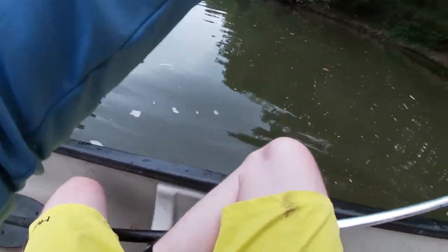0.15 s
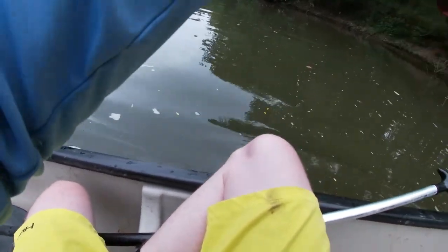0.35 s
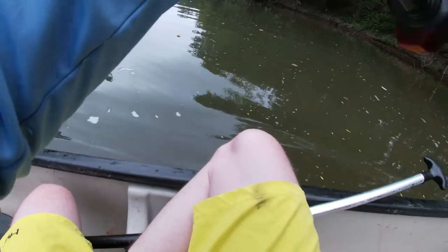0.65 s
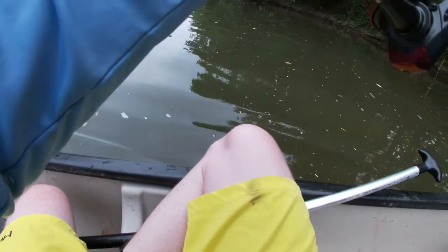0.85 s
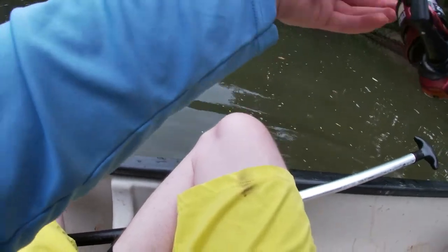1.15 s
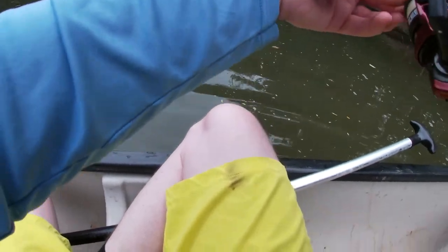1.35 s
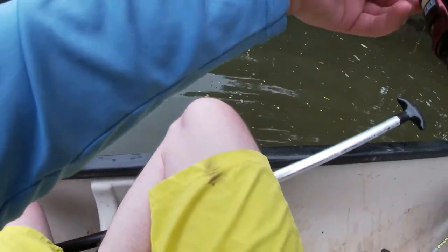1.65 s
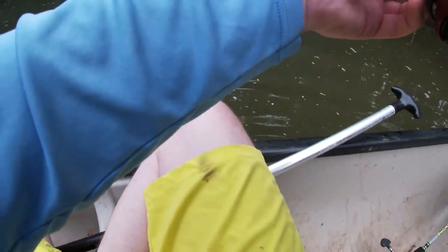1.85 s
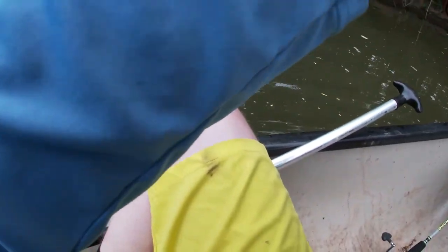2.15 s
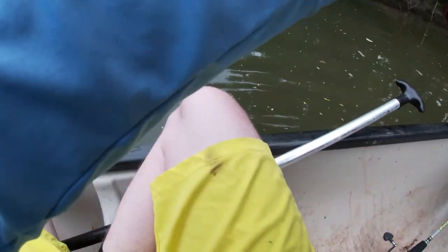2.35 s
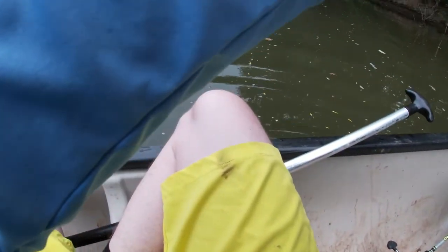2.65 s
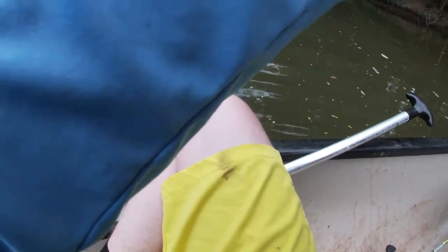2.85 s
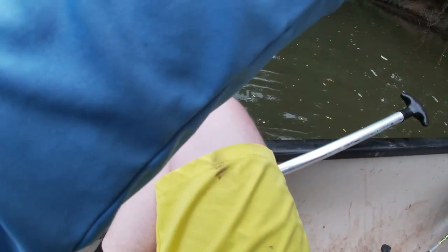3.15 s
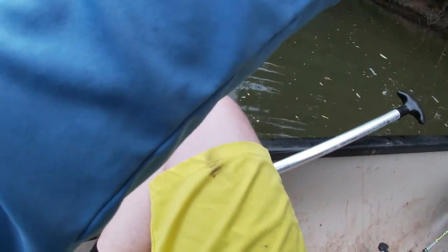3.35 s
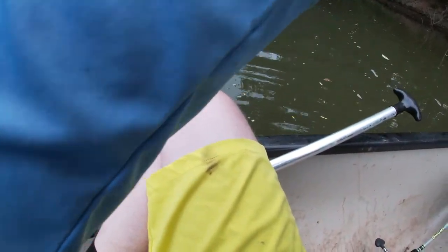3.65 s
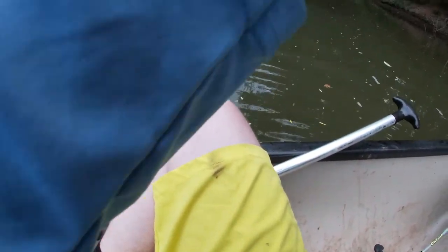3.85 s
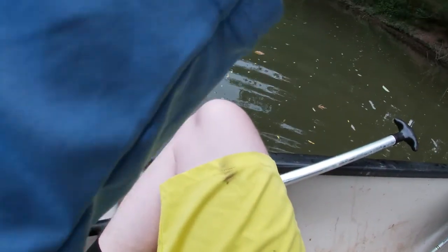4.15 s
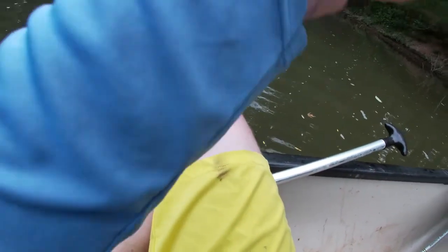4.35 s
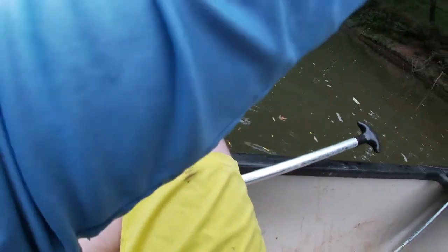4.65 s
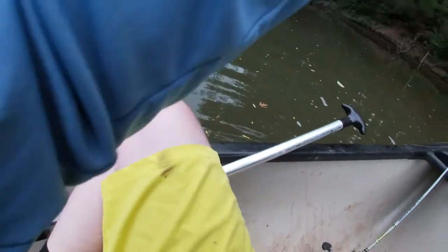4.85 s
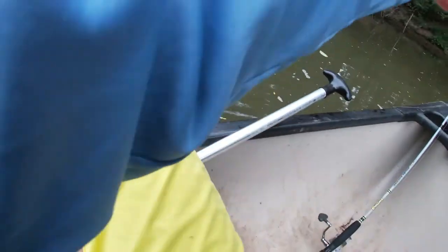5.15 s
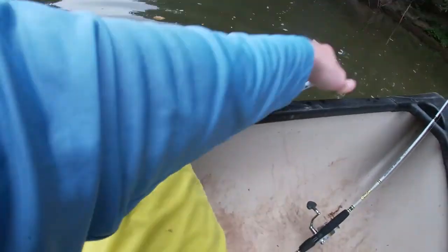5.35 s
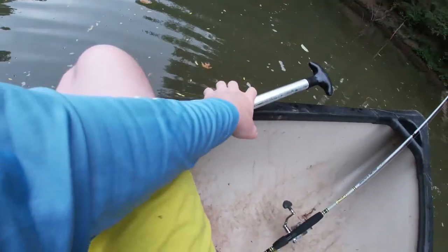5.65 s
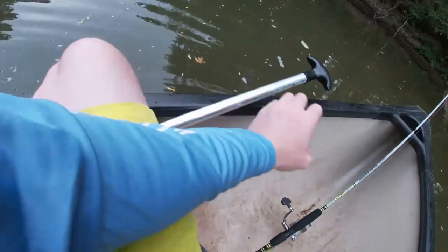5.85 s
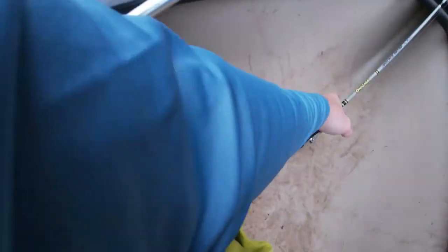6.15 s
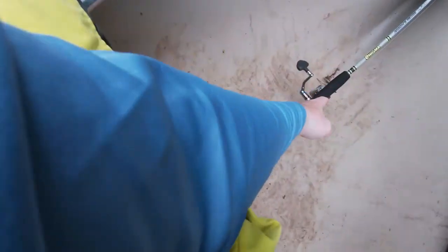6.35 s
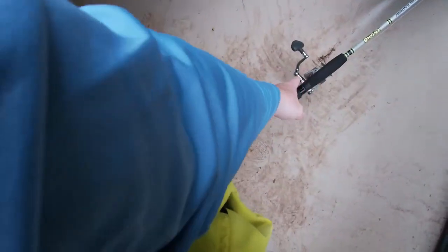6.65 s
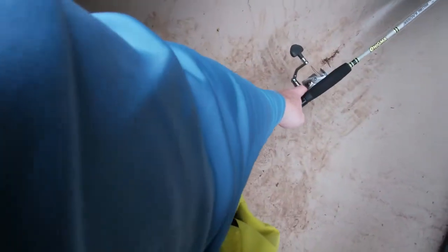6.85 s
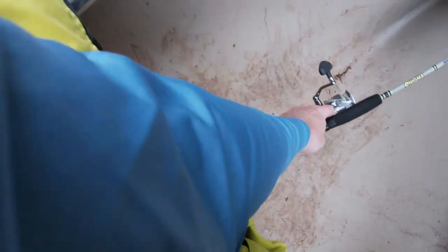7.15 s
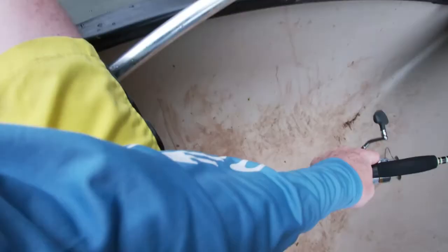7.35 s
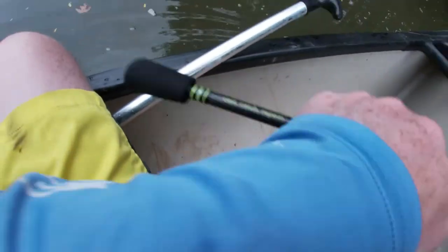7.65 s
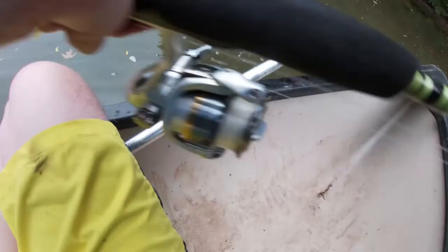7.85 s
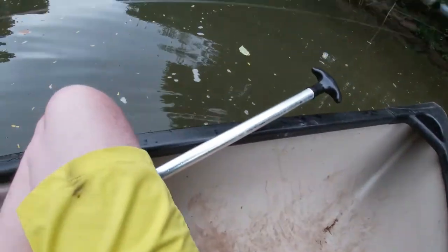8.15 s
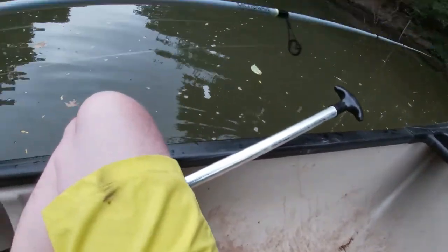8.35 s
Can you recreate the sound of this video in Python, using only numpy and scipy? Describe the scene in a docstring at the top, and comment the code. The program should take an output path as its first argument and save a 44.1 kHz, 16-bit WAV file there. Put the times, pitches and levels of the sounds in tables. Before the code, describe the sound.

An angler shifts in a canoe: irregular hull bumps, dry reel clicking, small metal ticks, sleeve brushing, and constant airy hiss on a still creek.

```python
"""Still creek, plastic canoe: an angler shifts about, heard by one microphone on the chest.
Paddle, rod and feet knock the hull (crowds of dying modes); rubbing and scrapes stir the same modes by grains.
A reel clicks in two bursts, tackle ticks, short notes creak, a sleeve rustles as shaped noise.
Behind: hiss peaking at the microphone port's resonance, a soft fuzzy whistle, a lumpy breeze."""
import sys
import numpy as np
from scipy import signal
from scipy.io import wavfile
from scipy.ndimage import uniform_filter1d

SR = 44100
rng = np.random.default_rng(int(sys.argv[2]) if len(sys.argv) > 2 else 0)


def to_wav(sig):
    """Store sig (one row per channel, or 1-D mono) as 16-bit WAV at the path in sys.argv[1].

    Samples outside -1..1 are clipped; the rate is SR.
    """
    pcm = np.clip(np.atleast_2d(sig), -1, 1) * 32767
    pcm = np.round(pcm).astype(np.int16)
    wavfile.write(sys.argv[1], SR, pcm.T)  # frames by channels


def ratio_of_db(decibels):
    """Turn decibels (scalar or array-like) into linear amplitude factors; 0 dB maps to 1."""
    return 10 ** (np.asarray(decibels, float) / 20)


N = 374409
HOP, SILENT_DB = 128, -120  # noise frame step, samples; level outside a curve


def evened(x):
    """Scales to rms 1."""
    return x / np.sqrt(np.mean(x ** 2) + 1e-20)


def level_of(rows):
    """Amplitude per sample from (t/s, level/dB) rows."""
    s, db = np.transpose(rows)
    return ratio_of_db(np.interp(np.arange(N) / SR, s, db))


def add(mix, s, sound, peak_db):
    """Mixes a sound in at time s with the given peak."""
    part = mix[round(s * SR):][:len(sound)]
    part += ratio_of_db(peak_db) * sound[:len(part)] / abs(sound).max()


def rings(hz, db, t60_s, phase, t):
    """Sum of exponentially dying sines."""
    decay = ratio_of_db(db[:, None] - 60 * t / t60_s[:, None])
    return (decay * np.sin(2 * np.pi * hz[:, None] * t + phase[:, None])).sum(0)


def noise(points, patchy_db, flicker_db):
    """Noise of a given spectrum with drifting patches and a quick flicker shared by all bands; rms 1."""
    hz = np.fft.rfftfreq(8 * HOP, 1 / SR)
    real, imag, patches = rng.standard_normal((N // HOP + 9, len(hz), 3)).T
    flicker = evened(uniform_filter1d(patches[0], size=6))
    patches = uniform_filter1d(patches, size=12, axis=0)  # across frequency
    patches = evened(uniform_filter1d(patches, size=24, axis=1))  # across time
    f, db = np.transpose(points)
    curve_db = np.interp(np.log(hz + 1), np.log(f + 1), db, left=SILENT_DB, right=SILENT_DB)
    field_db = curve_db[:, None] + patchy_db * patches + flicker_db * flicker
    spectrum = (real + 1j * imag) * ratio_of_db(field_db)
    return evened(signal.istft(spectrum, nperseg=8 * HOP, noverlap=7 * HOP)[1][:N])


def grains(per_s, spread_db):
    """Random clicks of either sign, a few of them large."""
    size = ratio_of_db(spread_db * np.minimum(rng.exponential(1, N), 4))
    return size * (rng.random(N) < per_s / SR) * rng.choice([-1., 1.], N)


def crack(t, t60_s, order=3):
    """A dying 1.5-10 kHz burst of noise from hard contact."""
    band = signal.butter(order, [1500, 10000], "band", fs=SR, output="sos")
    return signal.sosfilt(band, rng.standard_normal(len(t))) * ratio_of_db(-60 * t / t60_s)


def drift():
    """Slow random wander, rms 1."""
    return evened(uniform_filter1d(uniform_filter1d(rng.standard_normal(N), size=4000), size=4000))


# hull modes by pitch: f/Hz, level/dB (relative), free t60/s
HULL_MODES = [(45.24, -23, 0.67), (100, -13.5, 0.43), (162.7, 3.5, 0.36), (222, -6.5, 0.28),
              (248, -0.5, 0.33), (430, -3.5, 0.28), (800, -0.5, 0.16), (1030, 0, 0.1), (1320, -5.5, 0.08),
              (2100, -7, 0.078), (4602, -16.5, 0.045)]
MODE_COUNT = 70


def hull_modes(chance):
    """Close modes, a little moved and reweighted by where the hull is touched: Hz, dB, t60."""
    f, db, t60_s = np.transpose(HULL_MODES)
    hz = np.geomspace(f[0], f[-1], MODE_COUNT) * (1 + 0.021 * chance[0])
    mode_db = np.interp(np.log(hz), np.log(f), db) + 4.2 * chance[1]
    return hz, mode_db, np.interp(np.log(hz), np.log(f), t60_s)


# blows on the hull: t/s, peak level/dB, pitch struck most f/Hz, hardness/dB
KNOCKS = [(0.009, -19, 360, 10), (0.067, -25.5, 310, 11), (0.096, -31, 1080, 2), (0.16, -35, 1060, -1),
          (0.334, -30, 373, 1.5), (0.473, -30, 1030, -12), (0.537, -25.5, 380, -1), (0.566, -28, 375, -2.5),
          (0.621, -42, 2320, 3), (0.66, -31, 970, -9), (0.931, -35, 350, 6), (1.509, -39, 800, 8),
          (1.576, -26, 513, 5), (1.592, -13, 455, -4.5), (1.611, -24.5, 96, -11), (2.164, -44, 172, -16),
          (2.225, -36, 377, 9), (2.593, -14, 430, 5.5), (2.606, -12.5, 510, -3), (2.62, -17, 100.6, -12),
          (2.759, -22, 178, 5.5), (2.861, -26, 400, 3.5), (3.131, -24.5, 435, 0), (3.16, -25.5, 134, -6),
          (3.885, -34, 191, -9), (3.925, -38.5, 75, -35), (5.886, -31.5, 384, 4), (5.987, -33, 385, -2),
          (6.486, -21, 325, 4), (6.528, -23, 270, -47), (6.724, -23, 205, -13.5), (6.969, -6.5, 249, -18),
          (7.056, -34, 260, -28), (7.517, -37.5, 293, 1), (7.768, -31, 150, -32), (7.855, -33, 305, -1),
          (7.886, -30, 278, -1), (8.2, -32, 150, -33), (8.222, -33, 1250, -7), (8.428, -19.5, 467, 5),
          (8.449, -15.5, 200, 4.5)]
RING = 0.76  # share of the free decay left by the hand or foot on the hull


def knocks():
    """Blows favour modes near a pitch; soft ones swell slower and damp all but the bass sooner.

    Treble cracks at once, bending waves bring the bass late."""
    out, t = np.zeros(N), np.arange(SR // 3) / SR
    chance = rng.standard_normal((len(KNOCKS), 3, MODE_COUNT))
    for (s, peak_db, pitch_hz, hard_db), c in zip(KNOCKS, chance):
        hz, db, t60_s = hull_modes(c)
        near_db = (10.5 - 0.28 * hard_db) * np.exp(-(np.log2(hz / pitch_hz) / 0.28) ** 2)
        tilt_db = hard_db * np.clip(np.log2(hz / min(420, 2 * pitch_hz)) / 1.68, 0, 1)
        swell_s = 1.73 * ratio_of_db(-0.15 * hard_db) / hz + 1e-4
        swell = 1 - np.exp(-(t / swell_s[:, None]) ** 2)
        damping = RING * ratio_of_db(0.33 * hard_db * np.clip(np.log2(hz / 90), 0, 1))
        decay = ratio_of_db((db + near_db + tilt_db)[:, None] - 60 * t / (damping * t60_s)[:, None])
        waves = np.sin(2 * np.pi * hz[:, None] * t + 3 * c[2][:, None])
        add(out, s, (swell * decay * waves).sum(0), peak_db)
    return out


# weight shifting and rubbing on the hull: t/s, low-mode level/dB
SHIFTING = [(0, -48.5), (1.3, -58), (3.3, -51.5), (3.55, -67.5), (4.35, -64.5), (5.0, -49.5), (6.2, -51),
            (6.42, -45.5), (6.9, -40), (6.96, -58.5), (7.6, -46), (8.49, -50.5)]
# drags across the hull: start t/s, length/s, upper-mode level/dB
SCRAPES = [(0.064, 0.13, -53), (1.417, 0.13, -52), (1.629, 0.14, -47.5), (2.12, 0.18, -52.5),
           (6.478, 0.094, -44), (6.653, 0.15, -43.5), (7.5, 0.15, -50.5), (7.807, 0.13, -45)]
SHUDDER_DB, SHUDDER_T60_S = -23, 0.27  # gear rattling on: re the blow's peak, decay
RUB_UPPER_DB = -8  # upper modes re low ones


def shifting():
    """Dense rubbing grains ring the low modes; hard blows and scrapes stir the upper ones more."""
    low_level = level_of(SHIFTING)
    upper_level = low_level.copy()
    t = np.arange(SR // 2) / SR
    for s, peak_db, _, hard_db in KNOCKS:
        shudder = np.minimum(t / 0.0053, 1) * ratio_of_db(-60 * t / SHUDDER_T60_S)
        add(low_level, s, shudder, peak_db + SHUDDER_DB)
        add(upper_level, s, shudder, peak_db + SHUDDER_DB + 0.42 * hard_db)
    for s, length_s, db in SCRAPES:
        drag = np.sin(np.pi * np.arange(0, length_s, 1 / SR) / length_s)
        add(low_level, s, drag, db + 4.0)
        add(upper_level, s, drag, db - RUB_UPPER_DB)  # cancels the offset applied below
    t, low, upper = np.arange(SR // 5) / SR, np.zeros(N), np.zeros(N)
    for c in rng.standard_normal((4, 3, MODE_COUNT)):  # four places of contact
        hz, db, t60_s = hull_modes(c)
        is_low, is_upper = (hz > 125) & (hz < 500), (hz >= 500) & (hz < 1700)
        for mix, part in ((low, is_low), (upper, is_upper)):
            body = rings(hz[part], db[part], 0.38 * t60_s[part], 3 * c[2][part], t)
            body *= np.minimum(t / 0.0056, 1)
            mix += signal.oaconvolve(grains(80, 2.46), body)[:N]
    return low_level * evened(low) + ratio_of_db(RUB_UPPER_DB) * upper_level * evened(upper)


# pawl drops: t/s, peak level/dB
REEL_CLICKS = [(1.779, -12), (1.8085, -10.5), (1.832, -14), (1.8658, -15), (1.889, -15), (3.023, -11),
               (3.082, -10.5), (3.1335, -11.5), (3.1722, -11), (3.2068, -12.5), (3.2374, -12),
               (3.308, -12.5), (3.3509, -10.5), (3.3755, -12.5), (3.4055, -13)]
# small metal parts of the reel: f/Hz, level/dB (relative), t60/s
PAWL_MODES = [(2306, -13, 0.022), (5410, -11.5, 0.013), (6675, 4.5, 0.018), (7367, 5, 0.015),
              (8760, -12, 0.014), (10760, -9, 0.012), (12000, -11.5, 0.01)]


def reel():
    """The pawl drops on a tooth, rings small metal parts briefly and chatters in a wide dry tail."""
    out, t = np.zeros(N), np.arange(SR // 16) / SR
    hz, db, t60_s = np.transpose(PAWL_MODES)
    chance = rng.standard_normal((len(REEL_CLICKS), 3, len(PAWL_MODES)))
    for (s, peak_db), (a, b, c) in zip(REEL_CLICKS, chance):
        ring = rings(hz * (1 + 0.028 * a), db + 2.0 * b, t60_s, 3 * c, t)
        ring *= np.minimum(t / 0.0004, 1)
        ring *= 0.5 + 1 / (1 + (t / 0.0022) ** 4)  # the spring presses the pawl quiet
        chatter = np.diff(crack(t, 0.025, order=4), prepend=0)
        add(out, s, ring + ratio_of_db(0.5) * chatter, peak_db)
    return out


# small hard parts: t/s, peak level/dB, lowest ring f/Hz, top ring and crack control/dB
TICKS = [(0.8638, -31.5, 3060, -1), (1.312, -37, 2340, -15), (1.332, -25, 2380, -32),
         (1.3394, -23, 2350, -28), (1.977, -33, 2120, -24), (2.05, -26, 2370, -8),
         (2.0722, -37.5, 2380, -26), (3.476, -35, 2000, -19), (3.488, -35, 2080, -26),
         (3.553, -10.5, 2206, -13.5), (5.276, -28.5, 2450, -1), (5.303, -18.5, 2510, 8),
         (6.9705, -21, 2100, -12)]


def ticks():
    """A ragged contact of a few ms drives four dry rings over a low mode, plus a wide crack."""
    out, t = np.zeros(N), np.arange(SR // 24) / SR
    for s, peak_db, low_hz, upper_db in TICKS:
        hz = low_hz * np.array([1, 1.2, 1.95, 3.35])
        ring_db = np.array([0, -9, -8, 0.5 * upper_db + 14])
        ring = rings(hz, ring_db, 17 / hz, 0 * hz, t)  # t60 of 17 cycles
        ring *= np.minimum(t * low_hz / 2, 1) ** 2
        contact = rng.standard_normal(len(t)) * np.minimum(t / 0.00034, 1) * ratio_of_db(-60 * t / 0.004)
        tick = evened(signal.fftconvolve(ring, contact)[:len(t)])
        add(out, s, tick + ratio_of_db(upper_db - 6.5) * evened(crack(t, 0.063, order=6)), peak_db)
    return out


# creaks and squeaks: start t/s, length/s, peak level/dB, start f/Hz, end f/Hz
CREAKS = [(5.472, 0.066, -38.5, 1150, 1300), (6.448, 0.065, -37, 663, 650)]


def creaks():
    """A slip catches into a short wavering note that swells, glides and dies."""
    out = np.zeros(N)
    for s, length_s, peak_db, start_hz, end_hz in CREAKS:
        u = np.arange(0, length_s, 1 / SR) / length_s
        waver = 1 + 0.03 * evened(uniform_filter1d(rng.standard_normal(len(u)), size=200))
        hz = (start_hz + (end_hz - start_hz) * np.sin(2 * u)) * waver
        add(out, s, np.sin(np.pi * u) * np.sin(2 * np.pi * np.cumsum(hz) / SR), peak_db)
    return out


# strokes: start t/s, loudest t/s, end t/s, fine level/dB, coarse level/dB, catching threads/dB (relative)
SLEEVE = [(4.292, 4.5, 4.98, -57, -47.5, 15), (4.81, 4.906, 5.3, -56, -48, 10),
          (6.906, 7.327, 7.39, -46.5, -52.5, -20)]
# cloth snapping near the microphone: t/s, peak level/dB
SNAPS = [(4.35, -27), (4.567, -32), (5.232, -33)]
# fine rustle spectrum: f/Hz, level/dB per Hz (relative)
RUSTLE = [(4000, 5), (7000, -0.5), (9000, 1), (12500, -16.5), (15600, -26)]
STROKE_EDGE_DB = -19  # stroke start and end re its top


def sleeve():
    """Cloth brushes fine in the treble and coarse near 2.3 kHz, threads catch, and it snaps."""
    fibres = noise(RUSTLE, patchy_db=0.0, flicker_db=2.0)
    folds = noise([(1500, -31), (2300, -2.0), (3300, -19.0)], patchy_db=4.5, flicker_db=2.5)
    threads = 22 * uniform_filter1d(abs(grains(60, 5.2)), size=64)  # single threads catch
    out, t = np.zeros(N), np.arange(N) / SR
    for start, top, end, fine_db, coarse_db, catch_db in SLEEVE:
        edges_db = [STROKE_EDGE_DB, 0, STROKE_EDGE_DB]
        stroke = ratio_of_db(np.interp(t, [start, top, end], edges_db, SILENT_DB, SILENT_DB))
        fine = ratio_of_db(fine_db) * fibres * (1 + ratio_of_db(catch_db) * threads)
        out += stroke * (fine + ratio_of_db(coarse_db) * folds)
    t = t[:SR // 100]
    for (s, peak_db), start in zip(SNAPS, rng.integers(0, N - SR, len(SNAPS))):
        add(out, s, fibres[start:start + len(t)] * ratio_of_db(-60 * t / 0.014), peak_db)
    return out


# hiss spectrum, peak at the port's resonance: f/Hz, level/dB per Hz (relative)
HISS = [(1900, -17.5), (3700, -10), (4700, -14), (5900, -9), (6950, -0.5), (7350, -8), (7800, -20.5),
        (11000, -36.5), (15200, -55)]
# main hiss: t/s, level/dB
HISS_LEVEL = [(0, -46), (2.5, -48), (4.3, -46.5), (5, -43.5), (8.49, -42.5)]
# lower hiss spectrum: f/Hz, level/dB per Hz (relative)
LOWER_HISS = [(250, -60), (700, -4.5), (1900, 7.5), (2200, -33)]
LOWER_HISS_DB, LOWER_SWING_DB = -20, 4.5  # mean re main hiss, rms swing


def hiss():
    """Steady shaped noise whose lower part comes and goes."""
    lower = noise(LOWER_HISS, patchy_db=2.5, flicker_db=2.5)
    lower *= ratio_of_db(LOWER_HISS_DB + LOWER_SWING_DB * drift())
    return level_of(HISS_LEVEL) * (noise(HISS, patchy_db=-0.26, flicker_db=1.31) + lower)


# soft whistle: t/s, level/dB
WHISTLE_LEVEL = [(3.7, -69.5), (5.5, -51), (6.2, -51.5), (6.6, -77), (7.3, -48), (7.9, -56)]


def whistle():
    """A fuzzy whistle: patchy narrow noise near 1.3 kHz."""
    hollow = noise([(1050, -13.5), (1270, -3.0), (1500, -14.0)], patchy_db=5.5, flicker_db=1.0)
    return level_of(WHISTLE_LEVEL) * hollow


# breeze: t/s, level/dB before the drift
BREEZE_LEVEL = [(0, -69), (4.2, -66), (4.6, -59.5), (8.49, -53.5)]


def breeze():
    """A lumpy breeze on the microphone port: 16-55 Hz noise, drifting in level."""
    band = signal.butter(3, [16, 55], "band", fs=SR, output="sos")
    lumps = evened(signal.sosfilt(band, rng.standard_normal(N)))
    return level_of(BREEZE_LEVEL) * ratio_of_db(1.2 * drift()) * lumps


def scene():
    """One microphone feeds both channels."""
    contacts = knocks() + shifting() + reel() + ticks() + creaks() + sleeve()
    mono = contacts + hiss() + whistle() + breeze()
    return np.array([mono, mono])


def top_cut(x):
    """Nothing passes above the cut-off."""
    return signal.sosfilt(signal.butter(12, 16600, fs=SR, output="sos"), x)


def record(dry):
    """Delivers the finished mix through the recorder's treble cut-off, with no gain of its own."""
    return top_cut(dry)


dry = scene()
out = record(dry)
to_wav(out)
```